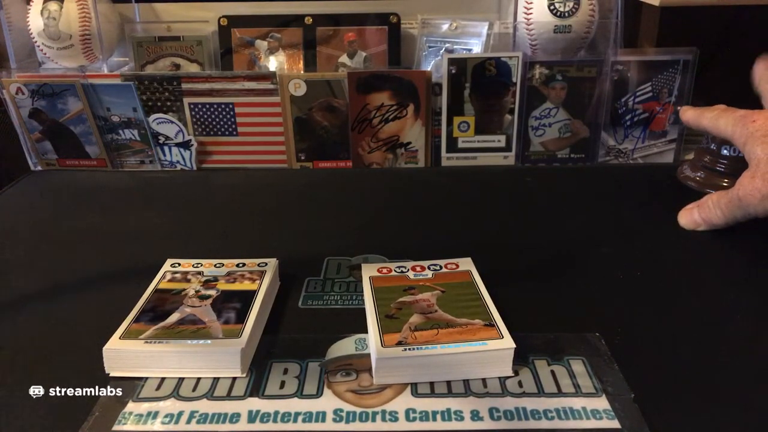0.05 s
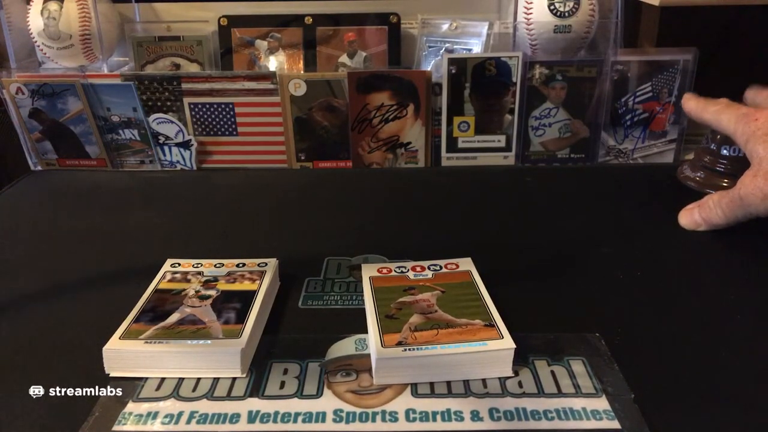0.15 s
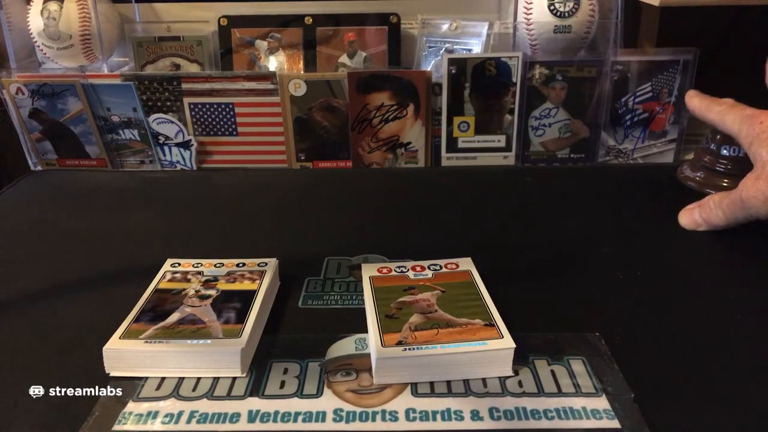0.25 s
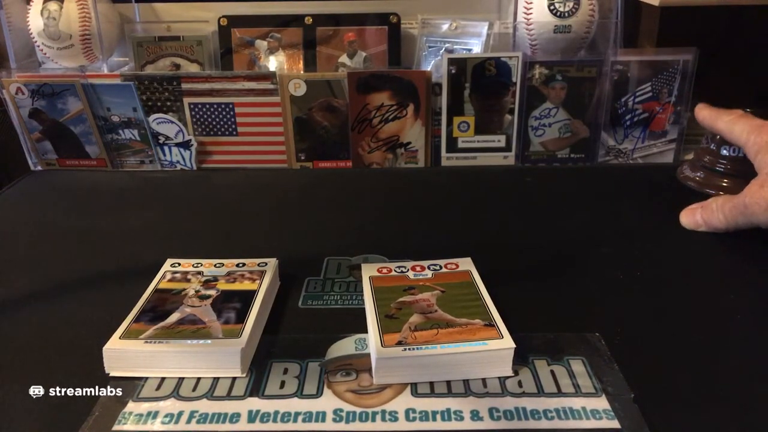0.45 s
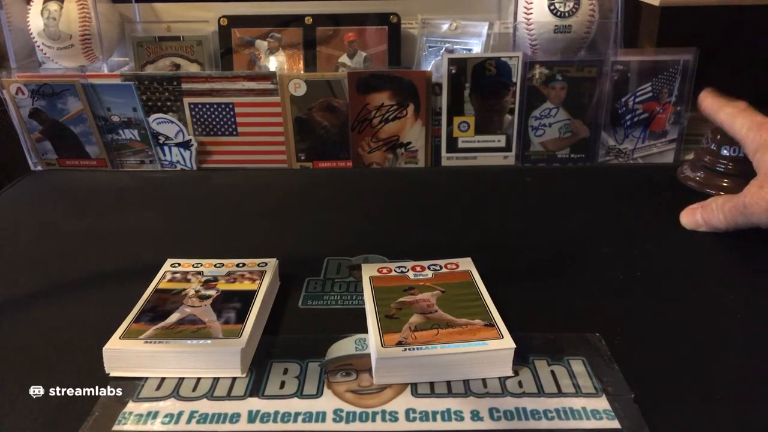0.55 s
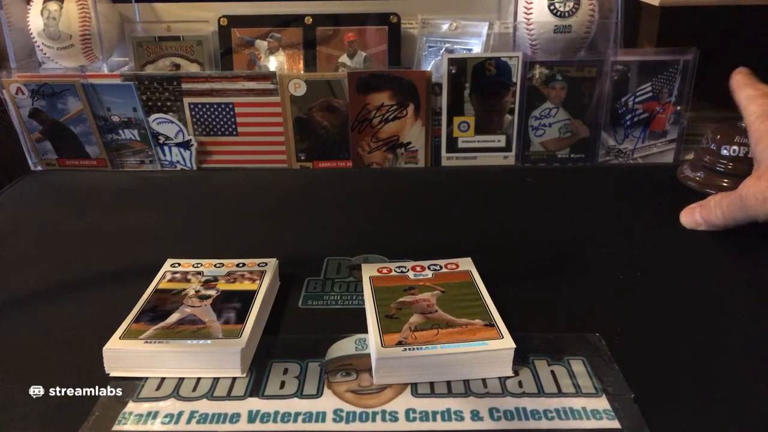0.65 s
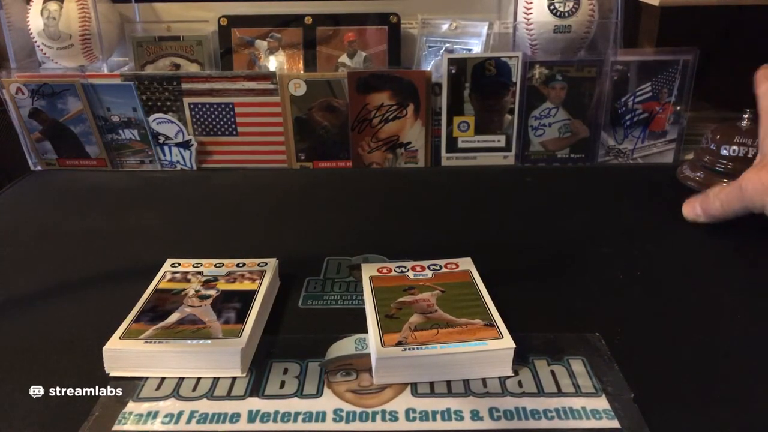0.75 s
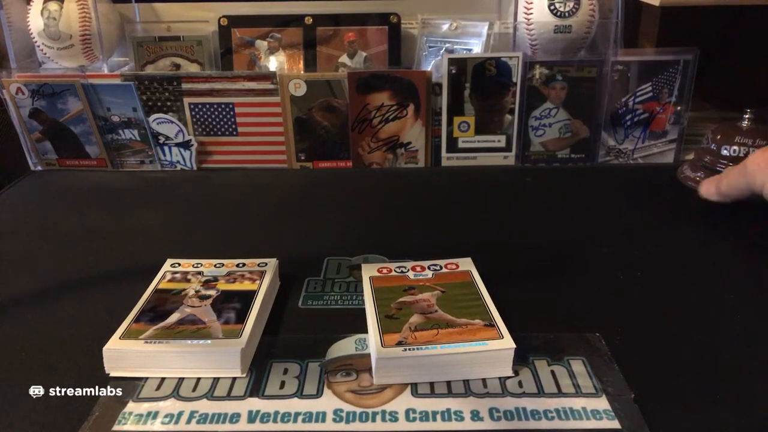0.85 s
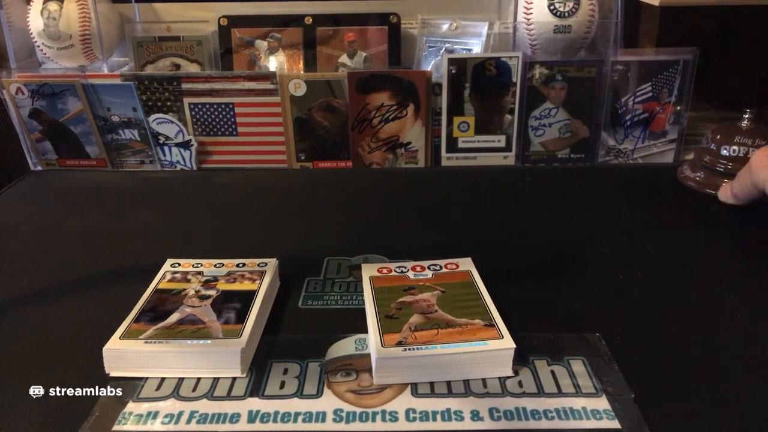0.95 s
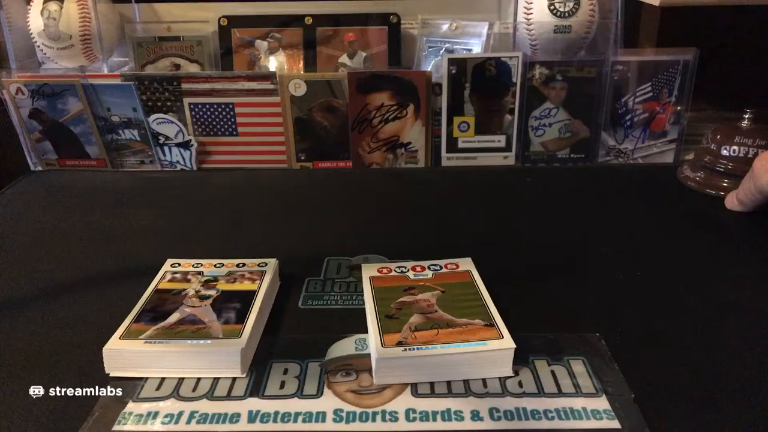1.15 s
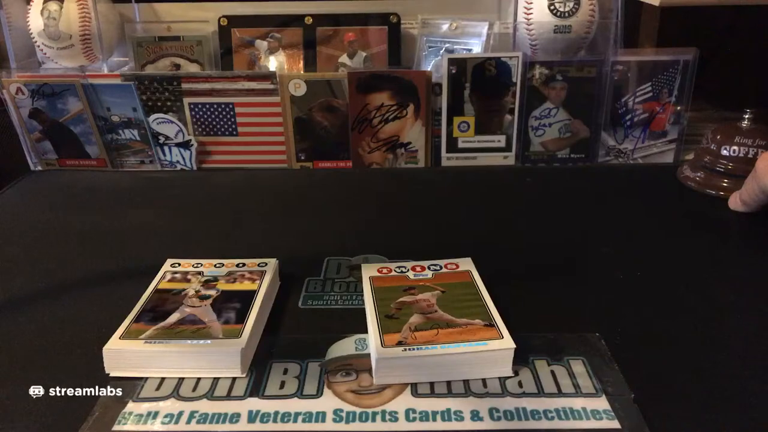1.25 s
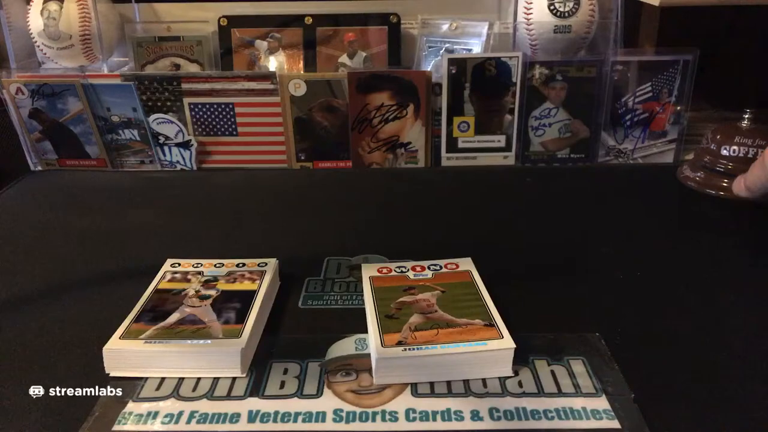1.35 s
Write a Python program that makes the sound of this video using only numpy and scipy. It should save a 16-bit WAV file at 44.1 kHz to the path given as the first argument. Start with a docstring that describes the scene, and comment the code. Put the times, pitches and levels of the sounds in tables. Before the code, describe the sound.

A small desk bell, heard close in a quiet room. From 0 seconds a thin high ring from an earlier strike fades. At about 0.22 the plunger clicks with a faint low thud, and the dome dings brightly at 0.23. Faint metallic chatter and ticks follow from 0.35 to 0.7, then a soft hand rustle near 0.8. The clear, gently beating ring decays to the end at about 1.4, over faint air noise and low hum.

```python
"""The dome of a small desk bell rings out in a quiet room as a finger presses its plunger, over a fading ring.
Each dome mode is a close pair of sines that beats; the blow adds short-lived modes and a noise burst.
The plunger snaps, ticks and chatters as sines and filtered noise; the finger's landing is a low dying sine.
The hand slides off as soft noise; coloured air noise and a low wavering hum lie beneath."""
import sys
import numpy as np
from scipy import signal
from scipy.fft import rfft, irfft
from scipy.io import wavfile
from scipy.ndimage import uniform_filter1d

SR = 44100
rng = np.random.default_rng(int(sys.argv[2]) if len(sys.argv) > 2 else 0)


def unload_audio(sound):
    """Save the sound as a 16-bit wav file, at the path given as the first command line argument."""
    columns = np.transpose(np.atleast_2d(sound))
    # keep every value between -1 and 1, then stretch to whole-number steps
    steps = np.round(np.clip(columns, -1, 1) * 32767)
    wavfile.write(sys.argv[1], SR, steps.astype(np.int16))


N = 61739  # length in samples

# Blows on the dome; the first falls before the start, so only its ring is heard.
# Each row: start [s], strength [dB], brightness [dB per octave above the lowest dome mode].
STRIKES = [(-1.03, 2, 6.5), (0.2328, 3, 1.83)]


def amp(db):
    """Decibels to linear gain."""
    return 10 ** (np.asarray(db) / 20)


def evened(x):
    """Scale a sound to rms 1."""
    return x / np.sqrt(np.mean(x ** 2) + 1e-20)


def read(points, hz):
    """Read a curve of (Hz, value) points, straight between them on a log-frequency axis."""
    f, value = np.transpose(points)
    return np.interp(np.log(hz + 1), np.log(f + 1), value)


def coloured(gain, size):
    """Noise of the given length and gain per frequency, rms 1."""
    hz = np.fft.rfftfreq(size, 1 / SR)
    spectrum = rfft(rng.standard_normal(size)) * gain(hz)
    return evened(irfft(spectrum, size))


def add(mix, s, sound):
    """Lay a sound into the mix from s seconds, cut off at the end of the mix."""
    part = mix[round(s * SR):][:len(sound)]
    part += sound[:len(part)]


def ring(modes, t):
    """Resonances as sines that die exponentially; each mode is (Hz, dB, t60 in s)."""
    return sum(amp(db - 60 * t / t60) * np.sin(2 * np.pi * hz * t) for hz, db, t60 in modes)


def dome():
    """Mode pairs beat as their two sines drift in and out of phase; each blow takes over from the ring before."""
    # Each row: pitch [Hz], level before strength and brightness [dB], t60 [s], partner's offset above [Hz],
    # partner's level against the first sine [dB], time of one lull after the blow [s].
    mode_pairs = [(1196.2, -27.5, 6.16, 0.26, -20.5, 1.85), (3263, -28, 3.29, 1.563, -6.5, 0.31),
                  (6115, -22, 1.368, 7.2, -5.5, 0.032), (8322, -27.5, 0.24, 66, -0.5, 0.041),
                  (9533, -30, 0.49, 11.8, 5.5, .06), (13324, -14, .26, 19, -3, 0.031)]
    bloom_s = 0.0044  # time constant of the new ring's rise and the old ring's fade
    t, out = np.arange(N) / SR, np.zeros(N)
    ends = [row[0] for row in STRIKES[1:]] + [np.inf]
    for (s, strength_db, tilt_db), end in zip(STRIKES, ends):
        u = np.maximum(t - s, 0)  # seconds since the blow
        rise = 1 - np.exp(-u / bloom_s)
        handover = np.exp(-np.maximum(t - end, 0) / bloom_s)
        for hz, mode_db, t60, split_hz, partner_db, lull in mode_pairs:
            turn = 2 * np.pi * (hz * u + rng.random())
            # Subtracting the partner makes the pair cancel most at the lull.
            partner = amp(partner_db) * np.sin(turn + 2 * np.pi * split_hz * (u - lull))
            pair = np.sin(turn) - partner
            bright_db = tilt_db * np.log2(hz / mode_pairs[0][0])
            level = amp(strength_db + mode_db + bright_db - 60 * u / t60)
            out += rise * handover * level * pair
    return out


def blow():
    """Short modes and a burst of noise that dies band by band, with a longer room tail."""
    # Pitches of the short-lived modes of dome, post and table [Hz].
    clank_pitches = [337, 490, 600, 2690, 3410, 4430, 6020, 6250, 8343, 8360, 9167, 9356, 9440, 13400,
                     13510]
    # The same modes. Each row: level before the strike's strength [dB], t60 [s], rise time constant [s].
    clank_modes = [(-32.5, 0.1664, .012), (-39, 0.046, .004), (-43.5, 0.2, 0.0068), (-36, 0.1941, .002),
                   (-27.5, .08, 0.00084), (-35.5, 0.2144, .002), (-12.5, 0.05, 0.00092),
                   (-18.5, 0.08, .001), (-10.5, 0.0351, .004), (-43, 0.67, .002), (-32.5, 0.095, .001),
                   (-35.5, .2, .001), (-45, .14, .001), (-27.5, .08, .001), (-30.5, .11, .001)]
    # Colour of the noise burst. Each row: frequency [Hz], relative level [dB per Hz].
    crash_colour = [(60, -14.5), (120, -2), (250, -14.5), (550, -9), (900, -16), (1800, -3), (3200, -2),
                    (6000, -1.5), (9000, 1), (11500, -8.5), (14000, -1), (16400, -18)]
    # Decay of the noise burst. Each row: frequency [Hz], t60 [s].
    crash_decay = [(80, 0.13), (500, 0.19), (2000, 0.074), (5000, 0.11), (15000, 0.091)]
    crash_db, crash_rise_s = -20, 0.00054  # level before the strike's strength; rise time constant
    echo_db, echo_t60 = -19, 0.57  # room tail: level against the burst, t60 in s
    t = np.arange(SR) / SR
    noise = coloured(lambda f: amp(read(crash_colour, f)), size=SR)
    hz, frames, z = signal.stft(noise, SR, nperseg=128)
    direct = amp(-60 * frames / read(crash_decay, hz)[:, None])
    echo = amp(echo_db - 60 * frames / echo_t60)
    burst = signal.istft(z * (direct + echo), SR, nperseg=128)[1][:SR]
    burst = amp(crash_db) * burst * (1 - np.exp(-t / crash_rise_s))
    clank = np.zeros(SR)
    for f, (db, t60, rise_s) in zip(clank_pitches, clank_modes):
        clank += ring([(f, db, t60)], t) * (1 - np.exp(-t / rise_s))
    return burst + clank


def press():
    """The plunger bottoms out: its modes ring briefly, with a snap of noise."""
    # Each row: pitch [Hz], level relative to the press [dB], t60 [s].
    plunger_modes = [(1660, -5.5, 0.017), (2496, -13, .015), (4510, 2, 0.056), (7000, -13, .015),
                     (7800, -17.5, .02), (10280, -2.5, .015)]
    press_db, rise_s = -30, 0.00031
    snap_db, snap_t60 = -1.5, 0.077  # level relative to the press, t60 in s
    t = np.arange(SR // 10) / SR
    snap = coloured(lambda f: f / (f + 1500), size=len(t))  # thinned below about 1500 Hz
    snap = amp(snap_db - 60 * t / snap_t60) * snap
    return amp(press_db) * (ring(plunger_modes, t) + snap) * (1 - np.exp(-t / rise_s))


def thud():
    """The finger landing, felt through the table: one low dying sine."""
    hz, db, t60 = 111, -36, .12
    return ring([(hz, db, t60)], np.arange(SR // 4) / SR)


def tick(db, centre_hz, octaves, t60):
    """A dull, dying puff of noise around one pitch."""
    t = np.arange(SR // 10) / SR
    puff = coloured(lambda f: np.exp(-(np.log2(f / centre_hz + 1e-3) / octaves) ** 2), size=len(t))
    return amp(db - 60 * t / t60) * puff


def chatter():
    """The loose plunger chatters as the finger lifts: noise through its narrow resonances."""
    # Each row: time [s], level [dB rms].
    chatter_level = [(.28, -80), (0.351, -62), (0.411, -57), (.45, -71), (0.489, -60.5), (.57, -60),
                     (.65, -65.5), (.7, -81.5), (1.0, -85)]
    # Each row: resonance [Hz], distance from its centre to half gain [Hz], relative level [dB].
    loose_modes = [(1620, 50, -6), (2675, 40, -3), (4230, 120, 0.3), (4500, 60, 0.5), (4960, 200, -1.5),
                   (6580, 140, -5), (7614, 21, -6.5), (8600, 150, -6), (10580, 99, -5.5), (11400, 60, -8),
                   (12350, 60, -8.5)]

    def resonances(f):
        return sum(amp(db) / (1 + ((f - hz) / width) ** 2) for hz, width, db in loose_modes)

    s, level_db = np.transpose(chatter_level)
    envelope_db = np.interp(np.arange(N) / SR, s, level_db, left=-120)
    return amp(envelope_db) * coloured(resonances, size=N)


def rustle():
    """The hand sliding off: a soft band of friction noise that swells and fades."""
    # Each row: time [s], level [dB rms].
    slide_level = [(.72, -70.5), (.82, -57), (0.951, -61.5), (1.102, -63), (1.4, -67.5)]
    centre_hz, width_hz = 1650, 1200  # width from the centre to half gain
    s, level_db = np.transpose(slide_level)
    band = coloured(lambda f: 1 / (1 + ((f - centre_hz) / width_hz) ** 2), size=N)
    return amp(np.interp(np.arange(N) / SR, s, level_db)) * band


def room():
    """Steady coloured air noise, and hum sines whose strength wavers with slow noise."""
    # Colour of the air. Each row: frequency [Hz], relative level [dB per Hz].
    air_colour = [(20, -6), (60, -5), (120, -11.5), (250, -16.5), (500, -23.5), (900, -34.5), (1600, -33.5),
                  (2500, -35.5), (4000, -39), (7000, -49.5), (10000, -41.5), (16400, -41)]
    # Each row: hum pitch [Hz], level before the waver [dB rms].
    hum_tones = [(30.4, -59), (59.5, -58)]
    air_db = -57.5  # rms
    waver_hz, waver_depth = 3, 0.32  # bandwidth of the waver; its rms as a share of the hum
    t = np.arange(N) / SR
    out = amp(air_db) * coloured(lambda f: amp(read(air_colour, f)), size=N)
    for hz, db in hum_tones:
        tone = np.sqrt(2) * np.sin(2 * np.pi * (hz * t + rng.random()))
        waver = coloured(lambda f: np.exp(-(f / waver_hz) ** 2), size=N)
        out += amp(db) * tone * (1 + waver_depth * waver)
    return out


def scene():
    """Mix the lasting layers, then place the blow, press, thud and ticks in time."""
    # Small ticks of plunger and finger.
    # Each row: start [s], level at the start [dB], centre [Hz], width [octaves], t60 [s].
    small_ticks = [(.346, -48.5, 1700, 0.39, 0.068), (.357, -42, 4500, 1.1, 0.13),
                   (.6362, -43.5, 1300, 0.94, 0.014), (.641, -56.5, 2000, 0.72, 0.014),
                   (.6535, -50, 1500, 1.05, 0.032), (.7983, -48.5, 2400, 0.51, .015),
                   (.845, -65.5, 10500, .4, 0.026)]
    press_s, thud_s = .2178, .222
    mix = dome() + chatter() + rustle() + room()
    for s, strength_db, _ in STRIKES:
        if s >= 0:
            add(mix, s, amp(strength_db) * blow())
    add(mix, press_s, press())
    add(mix, thud_s, thud())
    for s, *sound in small_ticks:
        add(mix, s, tick(*sound))
    return mix[None]


def record(dry):
    """Gain control turns down after the blow and recovers slowly; then the band limit."""
    knee_db, squeeze = -18, 0.25  # dB of gain cut per dB above the knee
    fall_db_per_s = 20  # how fast the held level sinks after a peak
    edge_hz = 16350  # treble cutoff
    # Mean power over the latest 800 samples.
    power = uniform_filter1d((dry ** 2).mean(0), 800, origin=399)
    power_db = 10 * np.log10(abs(power) + 1e-12)
    # A running maximum on a rising ramp holds each peak and lets it sink steadily.
    fall = np.arange(N) * fall_db_per_s / SR
    held_db = np.maximum.accumulate(power_db + fall) - fall
    over_db = np.maximum(held_db - knee_db, 0)
    ducked = dry / amp(squeeze * over_db)
    lowpass = signal.firwin(1023, edge_hz, window=("kaiser", 9), fs=SR)
    return signal.oaconvolve(ducked, lowpass[None], "same")


dry = scene()
out = record(dry)
unload_audio(out)
```